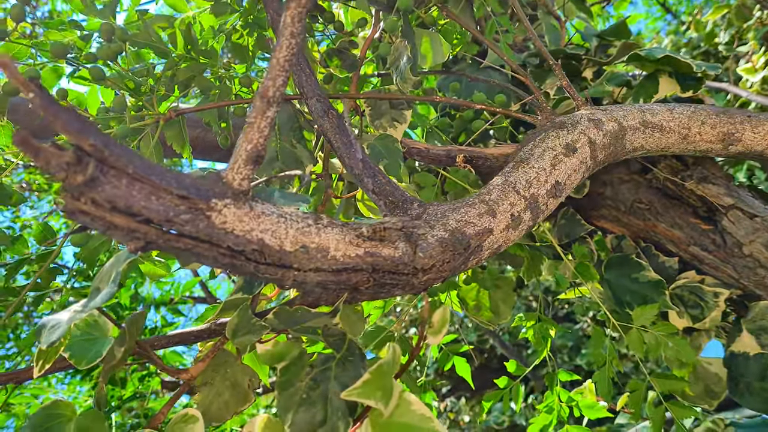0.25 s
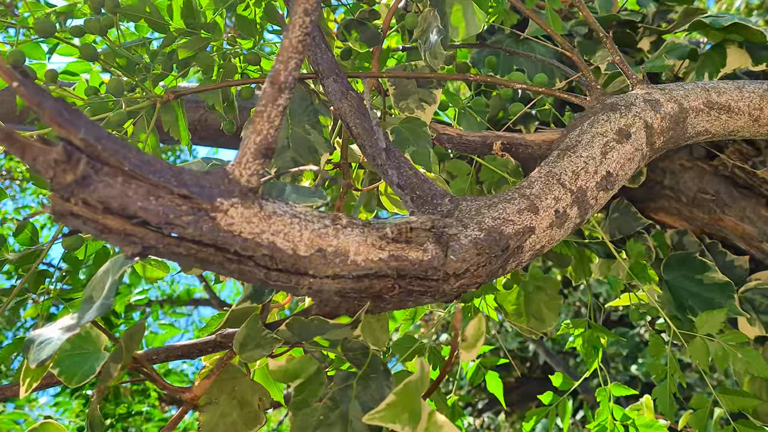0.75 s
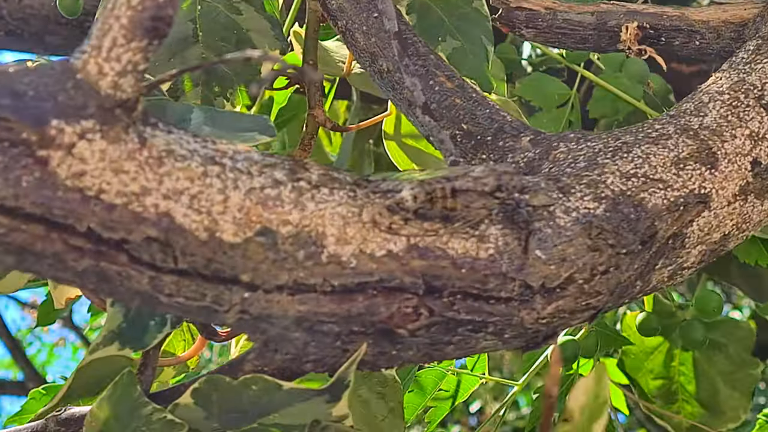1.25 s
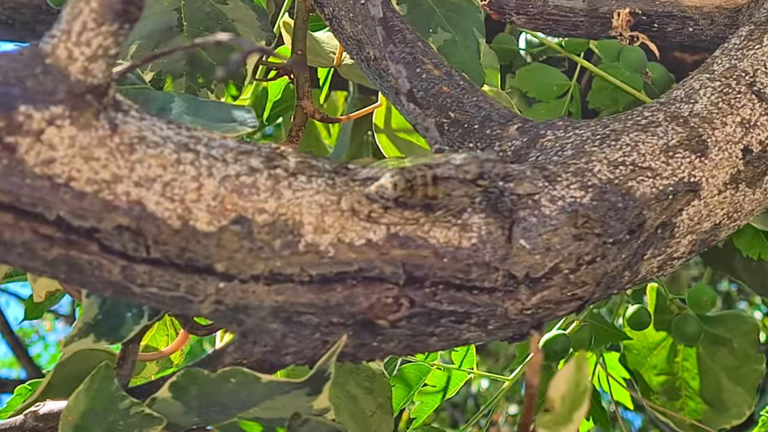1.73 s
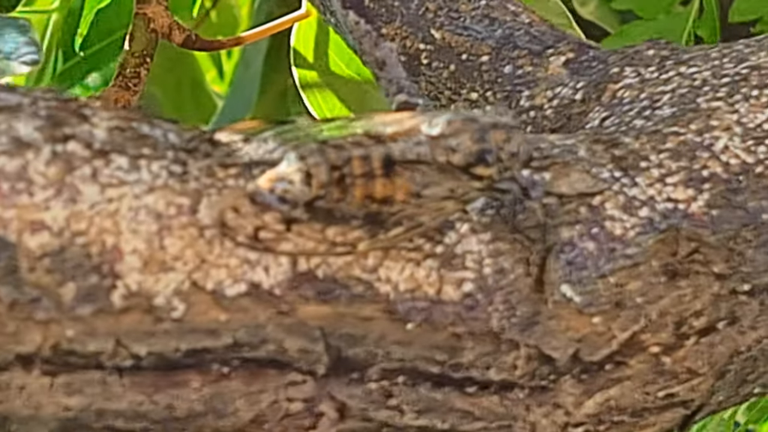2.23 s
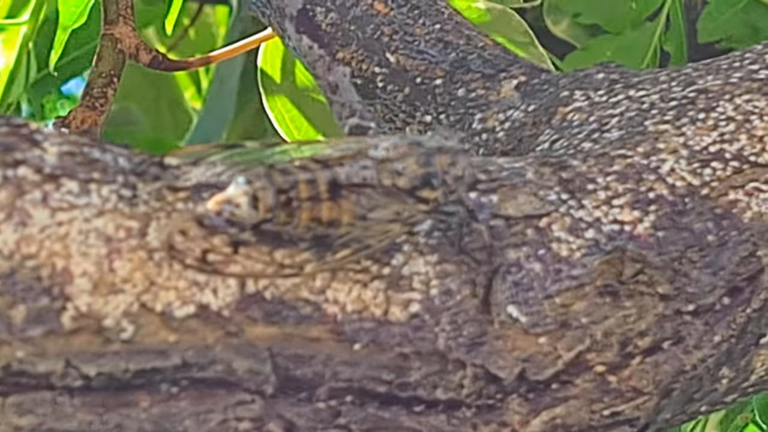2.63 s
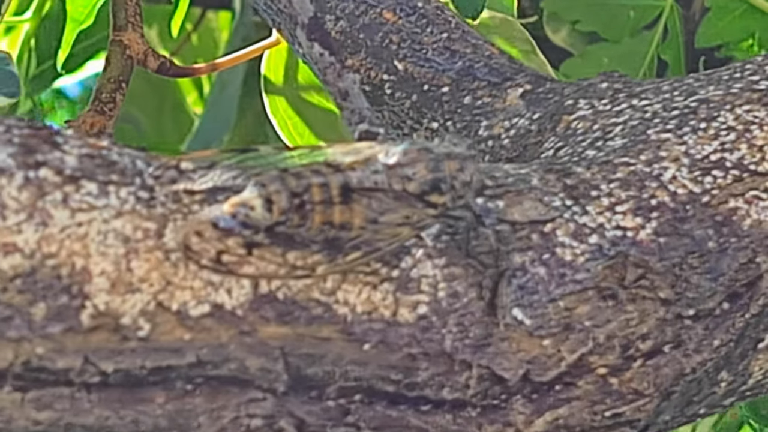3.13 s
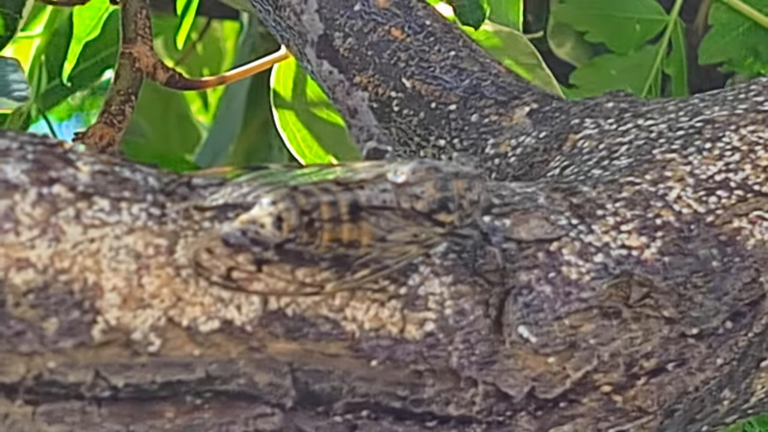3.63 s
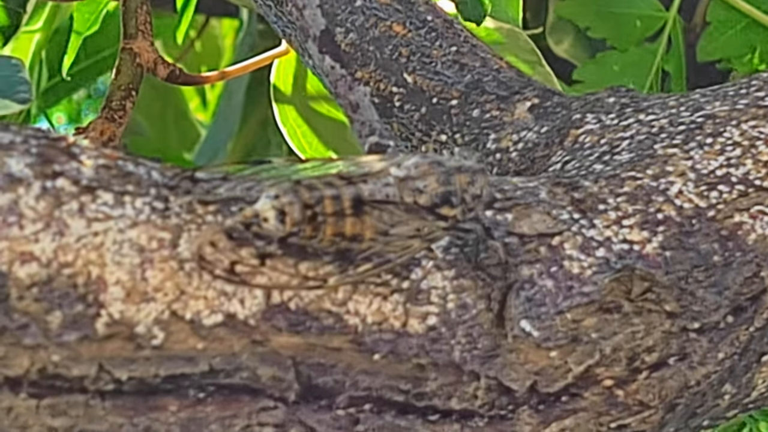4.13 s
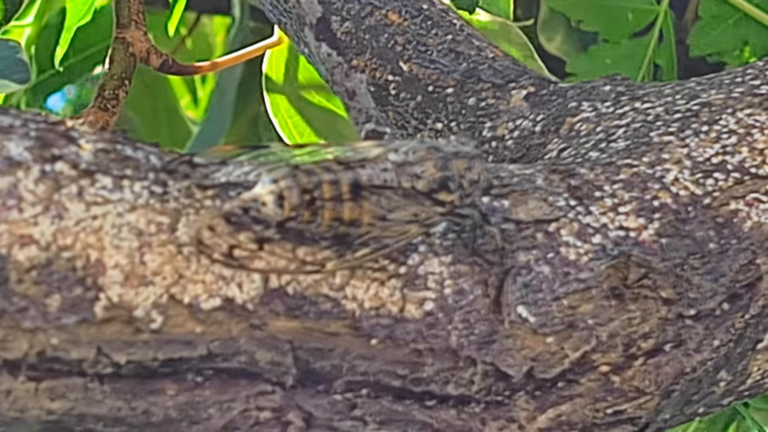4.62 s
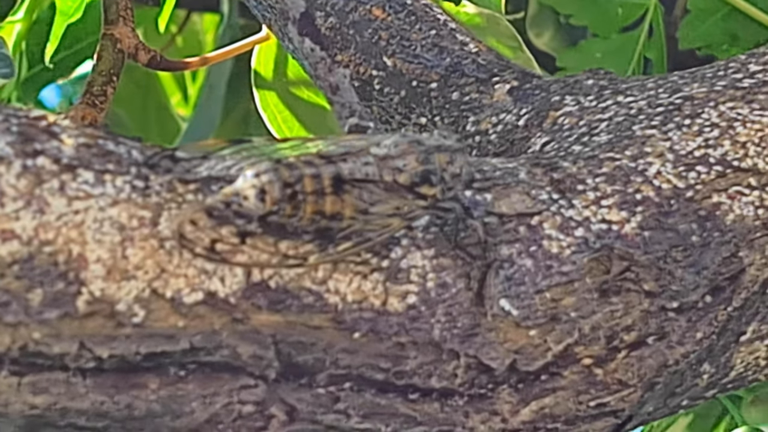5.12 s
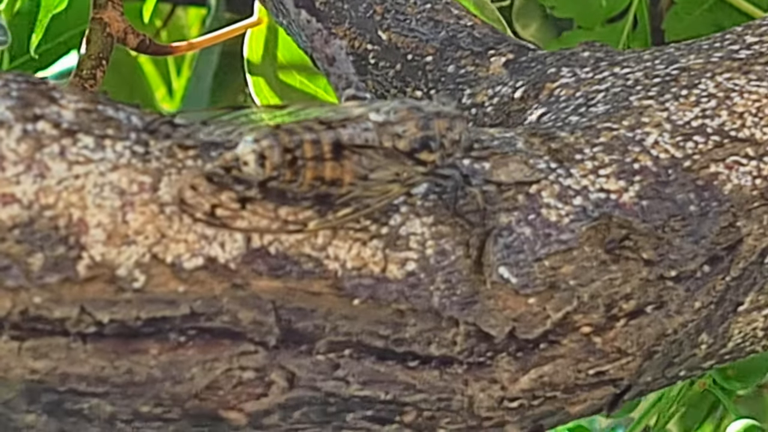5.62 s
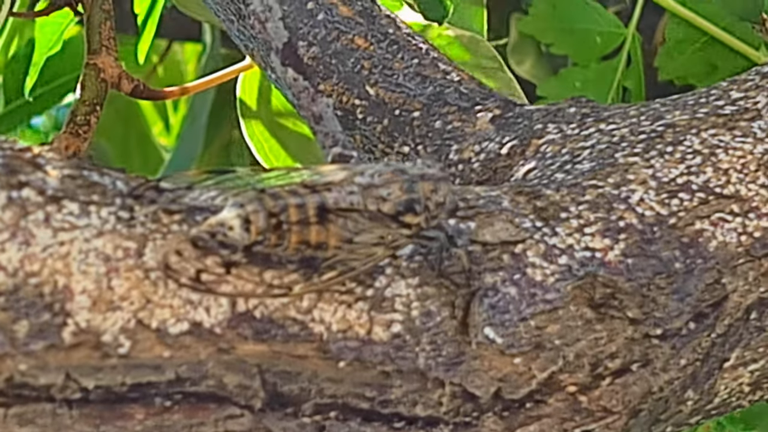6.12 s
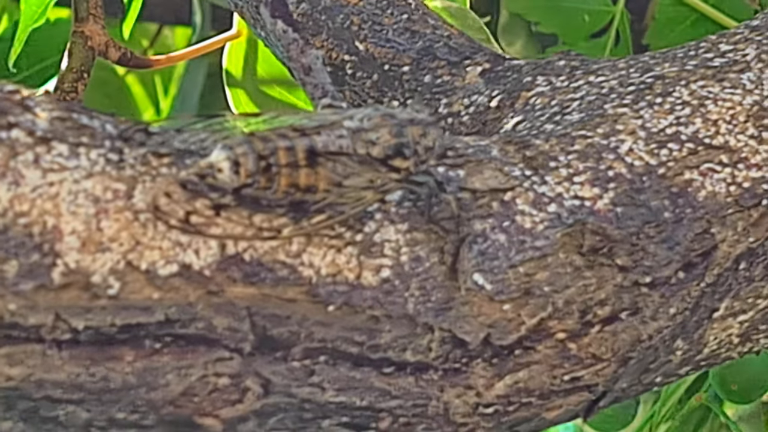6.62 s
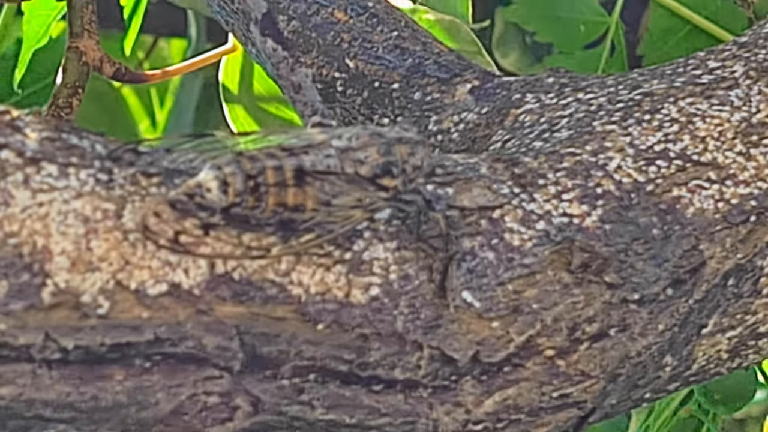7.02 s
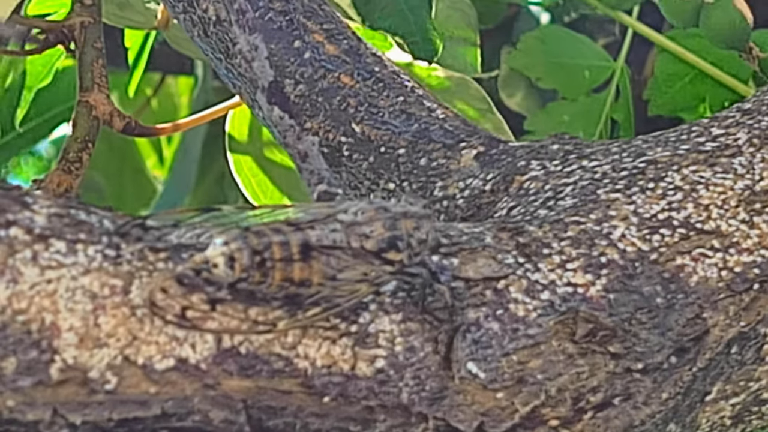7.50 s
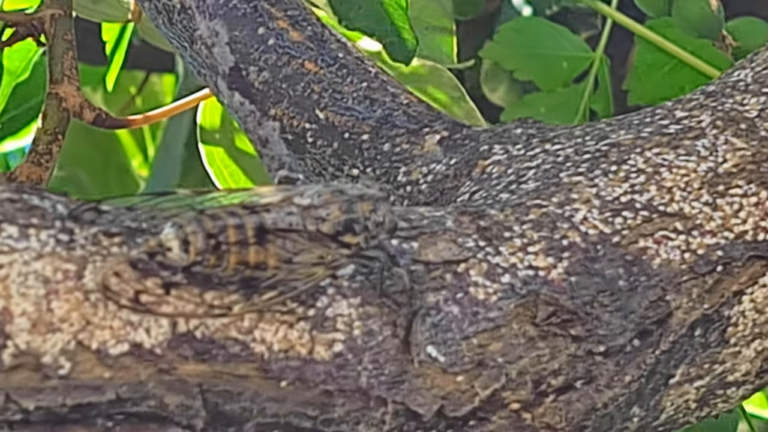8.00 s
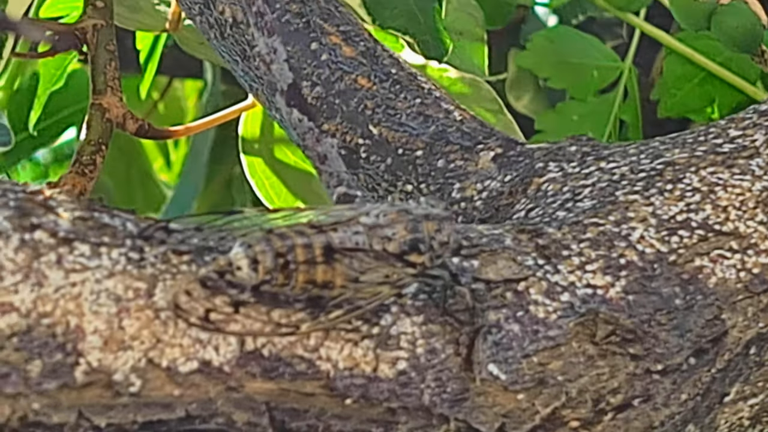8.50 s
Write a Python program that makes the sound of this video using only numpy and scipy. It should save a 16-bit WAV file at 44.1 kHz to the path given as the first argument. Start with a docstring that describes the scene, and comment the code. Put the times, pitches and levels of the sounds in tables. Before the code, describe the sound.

A cicada chirps close by in a tree, high and rasping, over a distant insect chorus, light breeze and faint traffic.

```python
"""In a tree on a summer day, a cicada sings close to a phone, in chirps of about a dozen contractions.
Each contraction buckles the ribs of a tymbal in turn, and their clicks excite the resonances of the
hollow abdomen; bark and leaves scatter the sound. A neighbour answers over a distant chorus, a breeze
rumbles, far traffic fades away, and fingers tap the phone's case four times."""
import sys
import numpy as np
from scipy import signal
from scipy.fft import rfft, irfft, next_fast_len
from scipy.io import wavfile
from scipy.ndimage import uniform_filter1d

SR = 44100
rng = np.random.default_rng(int(sys.argv[2]) if len(sys.argv) > 2 else 0)


def unload_audio(sound):
    """Save the sound as a 16-bit wav file, at the path given as the first command line argument."""
    columns = np.transpose(np.atleast_2d(sound))
    # keep every value between -1 and 1, then stretch to whole-number steps
    steps = np.round(np.clip(columns, -1, 1) * 32767)
    wavfile.write(sys.argv[1], SR, steps.astype(np.int16))


N = 385875
T = np.arange(N) / SR
BLOCK = 8192  # samples that hold one chirp or tap
BLOCK_HZ = np.arange(BLOCK // 2 + 1) * SR / BLOCK

# spectrum of insects heard through foliage: f/Hz, relative level/dB
FAR_SPECTRUM = [(1500, -36), (2130, -6), (2400, -12), (3000, -14.5), (3550, -23), (4050, -2), (4450, 2.5),
                (5100, -5), (5900, -6), (6600, -4), (7400, -13.5), (8100, -22), (11200, -19), (15000, -33)]
# the singer's bearing as the hand turns the phone: t/s, left minus right level/dB, left lead/samples
BEARING = [(0, 1, -.6), (1.3, 1.9, -.8), (1.9, 2.5, 0), (2.3, 1.9, .2), (3.4, 3.8, 0), (5.95, 2.7, 0),
           (6.7, .9, .65), (8.75, .8, .55)]


def undb(db):
    """Amplitude ratio: a factor of ten per 20 dB."""
    return 10 ** (np.asarray(db) / 20)


def unit(x):
    """Normalisation to rms 1."""
    return x / np.sqrt(np.mean(x ** 2))


def curve(rows, column=1, at=T):
    """Linear interpolation of one column of a table against the first."""
    rows = np.array(rows)
    return np.interp(at, rows[:, 0], rows[:, column])


def add(out, x, start_s):
    """Superposition of a stereo sound on the mix."""
    i = int(start_s * SR)
    x, i = x[:, max(-i, 0):], max(i, 0)
    out[:, i:i + x.shape[1]] += x[:, :max(N - i, 0)]


def walk(hz):
    """Slow random modulation: hz values a second, joined by ramps, with a spread near 1."""
    hold = int(SR / hz)
    steps = np.repeat(rng.standard_normal(N // hold + 1), hold)
    return 1.3 * uniform_filter1d(steps, hold)[:N]


def colour(x, spectrum):
    """Spectral shaping to rms 1, falling 12 dB an octave below the lowest point."""
    hz, db = np.transpose(spectrum)
    size = next_fast_len(N)
    f = np.maximum(np.arange(size // 2 + 1) * SR / size, 1)
    gain = undb(np.interp(np.log(f), np.log(hz), db)) * np.minimum(f / hz[0], 1) ** 2
    return unit(irfft(rfft(x, size) * gain, size)[:, :N])


def field(correlation, lead_samples=0):
    """Partly coherent noise, whose shared part reaches the left microphone port lead_samples early."""
    shared = rng.standard_normal(N)
    coherent = np.array([shared, np.roll(shared, lead_samples)])
    return np.sqrt(correlation) * coherent + np.sqrt(1 - correlation) * rng.standard_normal((2, N))


def chorus(level_db=-42, waver_db=.5):
    """Incoherent summation: many distant cicadas merge into a nearly even hiss."""
    hiss = colour(field(.1) * undb(walk(400)), FAR_SPECTRUM)
    return hiss * undb(level_db + waver_db * walk(24))


def breeze(gust_db=1.76):
    """Turbulence buffets the ports in quick low gusts, mostly uncorrelated between the two."""
    strength = [(0.0, -31.5), (1.0, -30), (1.12, -44), (1.32, -30.5), (1.76, -43), (1.96, -35.5),
                (2.2, -43), (2.32, -34.5), (2.44, -38.5), (2.64, -33), (2.88, -37.5), (4.92, -32.5),
                (5.48, -37.0), (6.56, -38.5), (6.96, -44), (7.08, -39.5), (8.12, -32.0), (8.75, -42)]  # course of the breeze: t/s, relative level/dB
    spectrum = [(15, -5.5), (30, -23), (48, -3.5), (70, 0.5), (100, -6), (150, -19), (300, -32.5),
                (800, -51.5)]  # buffeting: f/Hz, relative level/dB
    return colour(field(.2), spectrum) * undb(curve(strength) + .65 + gust_db * walk(13))


def traffic(rumble_gain_db=4, tyre_gain_db=6.5):
    """Attenuation with distance: rumble and tyre hiss recede on a road far to the left."""
    fade = [(0.0, -39, -50.5), (3.95, -51, -58.5), (4.31, -52.5, -60.5), (5.53, -55, -64.5),
            (7.55, -55.5, -67.5), (8.75, -58.5, -67)]  # receding traffic: t/s, relative rumble level/dB, relative tyre level/dB
    rumble_spectrum = [(60, -12), (120, -0.5), (190, -0.5), (280, -5.5), (420, -5.5), (520, -9.5),
                       (620, -7), (850, -13.5), (1500, -18), (4000, -69)]  # rumble: f/Hz, relative level/dB
    tyre_spectrum = [(400, -27), (800, -16), (1200, 3.5), (1700, 2), (2500, -5.5), (6000, -35)]  # tyre hiss: f/Hz, relative level/dB
    rumble = colour(field(.76, lead_samples=19), rumble_spectrum)
    rumble *= undb(curve(fade) + rumble_gain_db + 1.6 * walk(8.2))
    tyres = colour(field(.62, lead_samples=19), tyre_spectrum)
    return rumble + tyres * undb(curve(fade, column=2) + tyre_gain_db)


def tymbal(beats, force, spread_s, slip_s, ribs=11, rib_hz=2216.6, hurry=.075):
    """Sequential buckling: times and sizes of the rib clicks, the middle ones hardest and slowest."""
    place = np.linspace(-1, 1, ribs)
    offsets = place * (ribs // 2) / rib_hz * (1 - .06 * place ** 2)
    chance = rng.standard_normal((len(beats), 2, ribs))
    # the ribs follow each other faster as the force grows
    stretch = 1 + hurry * (force.mean() - force[:, None]) + .02 * rng.standard_normal((len(beats), 1))
    times = beats[:, None] + offsets * stretch + slip_s * chance[:, 0]
    sizes = force[:, None] / (1 + (offsets / spread_s) ** 2) * undb(chance[:, 1])
    return times, sizes


def clicks(times, sizes):
    """Band-limited impulses, placed between samples by a windowed sinc."""
    centres = times.reshape(-1, 1) * SR
    samples = centres.astype(int) + np.arange(-7, 9)
    pulses = np.sinc(samples - centres) * np.sinc((samples - centres) / 8) * sizes.reshape(-1, 1)
    return np.bincount(samples.ravel() % BLOCK, pulses.ravel(), BLOCK)


def ring(x, modes):
    """Resonance: steep-sided modes radiate differently to left and right."""
    power = sum(undb([[left_db], [right_db]]) ** 2 / (1 + ((BLOCK_HZ - hz) / width) ** 2) ** 3
                for hz, width, left_db, right_db in modes)
    cepstrum = irfft(np.log(power.mean(axis=0)))
    phase = rfft(cepstrum[:BLOCK // 2], BLOCK).imag  # causal: the ring follows the blow
    return irfft(rfft(x) * np.sqrt(power) * np.exp(1j * phase))


def abdomen(times, sizes, rasp, pan_db, full_rasp=.55):
    """Cavity resonance: clicks ring the hollow abdomen, one upper mode more so when the song rasps."""
    modes = [(2070, 410, -19.5, -12.5), (2969, 316, 0, -1.5), (4380, 326, 3, 2), (5110, 1130, 0.5, 3),
             (6565, 1170, 0.5, -8.5), (7480, 230, -4.5, -16)]  # abdominal modes: f/Hz, width/Hz, left level/dB, right level/dB
    lift_db = 1 + .9 * min(rasp / full_rasp, 1)
    upper_mode = (5466, 307, 6.2 + lift_db, 4.1 + lift_db)
    left, right = ring(clicks(times, sizes), modes + [upper_mode])
    return np.array([unit(left) * undb(pan_db / 2), unit(right) * undb(-pan_db / 2)])


def crinkle(times, sizes, t60=.013, correlation=.52):
    """Damped vibration: each snap leaves a brief noise in the ribs' own modes."""
    modes = [(8790, 520, 4, 7.5), (10630, 1500, -1.5, 6), (12600, 1360, 3.5, -15), (14200, 1200, -20, -2)]  # rib modes: f/Hz, width/Hz, left level/dB, right level/dB
    energy = signal.fftconvolve(clicks(times, sizes ** 2), undb(-120 * T[:BLOCK] / t60))[:BLOCK]
    shared = np.sqrt(correlation) * rng.standard_normal(BLOCK)
    noise = shared + np.sqrt(1 - correlation) * rng.standard_normal((2, BLOCK))
    return ring(noise * np.sqrt(np.maximum(energy, 0)), modes)


def chirp(contractions, rate_hz, rasp, pan_db, onset_s, second_lead_s=.0021, snap_db=-16.5):
    """Pulse-train excitation: the muscle pulls ever harder; a second tymbal fills the gaps in a rasp."""
    k = np.arange(contractions)
    warm_up_s = .004 * (1 - np.exp(-k / 1.3))  # the first contractions are further apart
    beats = onset_s + k / rate_hz + warm_up_s + .0001 * rng.standard_normal(contractions)
    slack = 1 - (k + 1) / contractions  # falls to 0 at full force
    swell_db = -4 * (1 + rasp) * slack ** 2.5
    force = undb(swell_db + .4 * rng.standard_normal(contractions))
    first = tymbal(beats, force, spread_s=.001 + .0002 * rasp, slip_s=.000014 + .00004 * rasp)
    between = beats - second_lead_s + .0004 * rng.standard_normal(contractions)
    second = tymbal(between, force * (k > 0) * (.2 + .7 * rasp), spread_s=.0008, slip_s=.00004)
    times, sizes = np.concatenate([first, second], axis=1)
    # hard pulls snap the ribs more sharply
    snap = undb(-10 * np.tile(slack, 2)[:, None] + .65 * rng.standard_normal(times.shape))
    sound = abdomen(times, sizes, rasp, pan_db) + undb(snap_db) * unit(crinkle(times, sizes * snap))
    length_s = contractions / rate_hz + .003
    return sound * np.sqrt(length_s * SR / BLOCK)  # equal power for long and short chirps


def ports(sound, at_s):
    """Diffraction: sound bends round the phone, so the right port lags the left."""
    phase_lead = [(0, 0), (2000, .1), (2550, 2.1), (3000, 1.8), (4400, 2.2), (5450, 2.4), (6300, 3.8),
                  (8600, 4), (10000, 5.4), (11900, 7.7), (13700, 6.4), (15300, 8.7)]  # lead of the left port: f/Hz, phase/rad
    lead_samples = curve(BEARING, column=2, at=at_s)
    lag = curve(phase_lead, at=BLOCK_HZ) + 2 * np.pi * BLOCK_HZ / SR * lead_samples
    left, right = sound
    return np.array([left, irfft(rfft(right) * np.exp(-1j * lag))])


def cicada(song_db=-19, facing_gain=.71, false_start_db=-4.5, onset_s=.01, ring_delay_s=.0003):
    """Directivity: the near insect's chirps are loudest when it faces the left port."""
    chirps = [(0.027, 15, 222), (0.4205, 14, 211), (0.6793, 12, 206), (0.9146, 11, 198), (1.2764, 14, 232),
              (1.6352, 15, 212), (1.877, 11, 216), (2.285, 13, 216), (2.6543, 14, 209), (2.9176, 12, 209),
              (3.3023, 14, 214), (3.5752, 14, 211), (3.8185, 12, 210), (4.0556, 12, 219), (4.4641, 14, 212),
              (4.7549, 1, 410), (4.7816, 11, 214), (5.0313, 14, 204), (5.266, 13, 214), (5.4912, 1, 208),
              (5.5069, 10, 218), (5.7166, 12, 214), (5.93, 13, 205), (6.2941, 17, 229), (6.7016, 17, 213),
              (6.9922, 13, 210), (7.2428, 15, 221), (7.5073, 13, 205.5), (7.7306, 12, 203),
              (7.9528, 12, 204.5), (8.1792, 10, 210), (8.412, 13, 222), (8.6221, 12, 196)]  # the song: t/s, number of contractions, contraction rate/Hz
    out_of_step = [(0, 0.67), (.9, 0.28), (2.3, .3), (2.9, 0), (5.95, 0.02), (6.3, 0.52), (6.7, 0.32),
                   (8.75, 0.1)]  # mismatch of the two tymbals: t/s, rasp (0 to 1)
    out = np.zeros((2, N))
    for start_s, contractions, rate_hz in chirps:
        rasp = curve(out_of_step, at=start_s)
        pan_db = curve(BEARING, at=start_s)
        level_db = song_db + facing_gain * pan_db
        if contractions == 1:  # a lone contraction never reaches full force
            level_db += false_start_db
        sound = ports(chirp(contractions, rate_hz, rasp, pan_db, onset_s), start_s)
        add(out, sound * undb(level_db), start_s - onset_s - ring_delay_s)
    return out


def foliage(song):
    """Scattering: near branches return a quick echo, the crown a longer and duller one."""
    branches, crown = (-9, .06, 16000), (-21, .32, 9000)  # level/dB, decay t60/s, cutoff f/Hz
    t = T[:SR // 2]
    out = 0
    for db, t60, cutoff_hz in (branches, crown):
        spectrum = rfft(rng.standard_normal((2, len(t))) * undb(-60 * t / t60) * (t > .001))
        power = uniform_filter1d(np.abs(spectrum) ** 2, size=200, axis=1)
        flat_tail = irfft(spectrum / np.sqrt(power))[:, :SR // 4]
        tail = signal.sosfilt(signal.butter(2, cutoff_hz, fs=SR, output="sos"), flat_tail)
        out = out + undb(db) * signal.fftconvolve(song, tail, axes=1)[:, :N]
    return out


def neighbour(base_db=-43.5, growth_db_per_s=42.5, buzz_hz=205, buzz_db=3):
    """Amplitude modulation: leaves smear a second cicada's pulses into a buzzing noise."""
    answers = [(.28, .13), (0.762, 0.057), (1.124, .15), (1.508, 0.15), (1.712, 0.12), (2.122, 0.14),
               (2.509, 0.13), (3.156, 0.084), (3.398, .09), (4.347, 0.1), (4.558, 0.054), (4.723, 0.12),
               (4.898, 0.095), (5.577, 0.068), (6.163, 0.13), (6.562, 0.12), (6.96, 0.11), (7.143, .1),
               (7.5, 0.082), (8.39, 0.11)]  # its chirps: centre t/s, nominal length/s
    swell = np.zeros(N)
    for centre_s, length_s in answers:
        shape = np.interp(T, centre_s + length_s * np.array([-.7, -.15, .3, .55]), [0, .9, 1, 0])
        swell += undb(base_db + growth_db_per_s * length_s) * shape  # longer chirps grow louder
    rate_hz = buzz_hz * (1 + .0272 * walk(40))
    buzz = undb(buzz_db * np.sin(2 * np.pi * np.cumsum(rate_hz) / SR))
    return colour(field(.078, lead_samples=8) * buzz, FAR_SPECTRUM) * swell


def finger_taps(t60=.0031, rattle_db=-19, rattle_t60=.14):
    """Impact excitation: soft knocks ring the phone's case, each with a faint rattle."""
    taps = [(1.6835, -16), (1.776, -24.5), (3.007, -31), (6.007, -24.5)]  # knocks: t/s, peak level/dB
    modes = [(474, 105, -24, 4), (820, 100, -27, 0.5), (1320, 730, 2.5, -24), (2620, 1500, -18.5, -10)]  # modes of the case: f/Hz, width/Hz, left level/dB, right level/dB
    out, t = np.zeros((2, N)), T[:BLOCK]
    decay = undb(-60 * t / t60) + undb(rattle_db - 60 * t / rattle_t60)
    for start_s, peak_db in taps:
        knock = ring(rng.standard_normal(BLOCK) * decay, modes)
        add(out, knock / np.abs(knock).max() * undb(peak_db), start_s)
    return out


def scene():
    """Superposition of the singer, its echoes and the summer day around it."""
    song = cicada()
    return song + foliage(song) + neighbour() + chorus() + breeze() + traffic() + finger_taps()


def record(dry, cutoff_hz=15750):
    """Band limiting: the phone's steep low-pass filter removes the highest treble."""
    return signal.sosfilt(signal.ellip(10, .2, 80, cutoff_hz, fs=SR, output="sos"), dry)


dry = scene()
out = record(dry)
unload_audio(out)
```